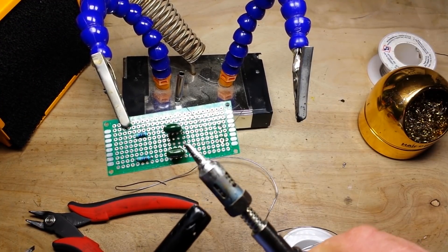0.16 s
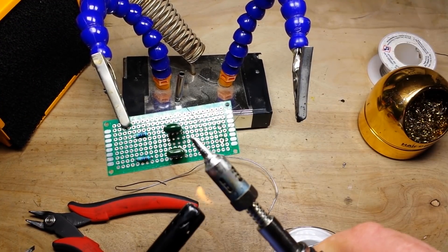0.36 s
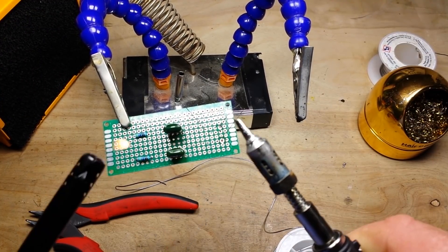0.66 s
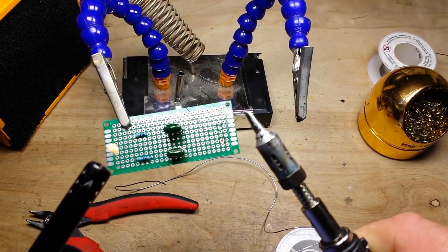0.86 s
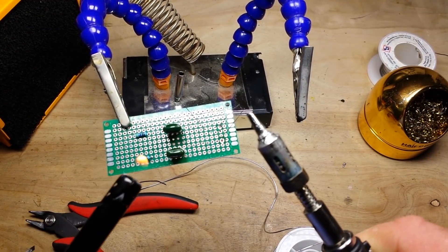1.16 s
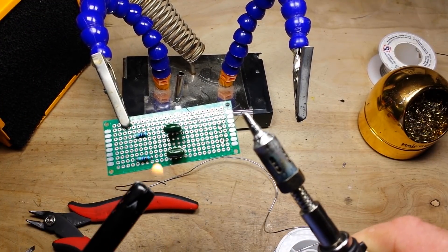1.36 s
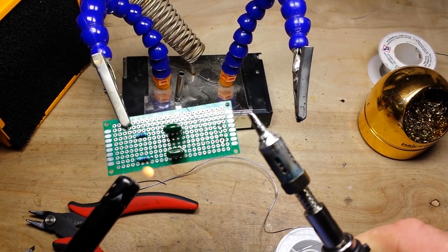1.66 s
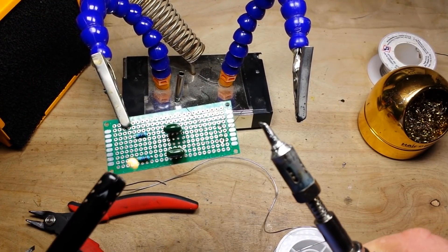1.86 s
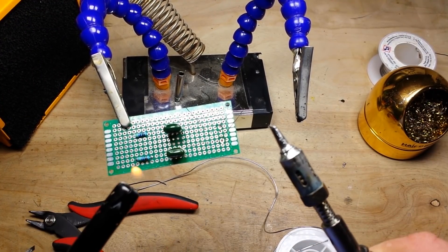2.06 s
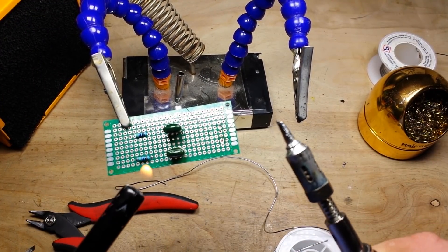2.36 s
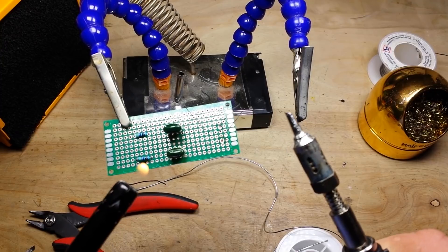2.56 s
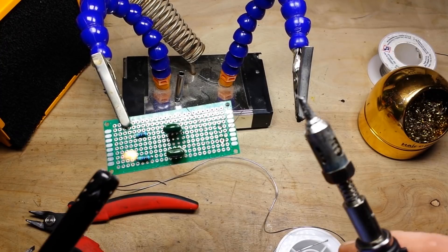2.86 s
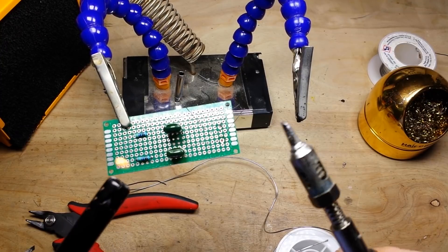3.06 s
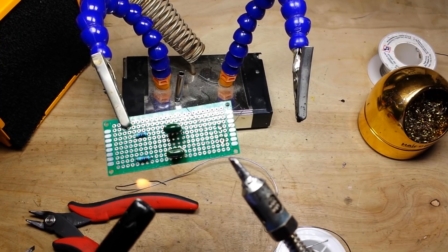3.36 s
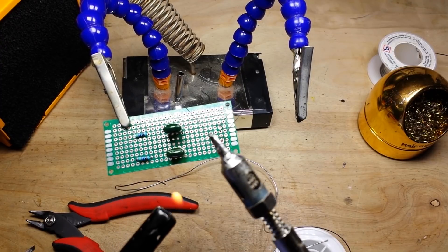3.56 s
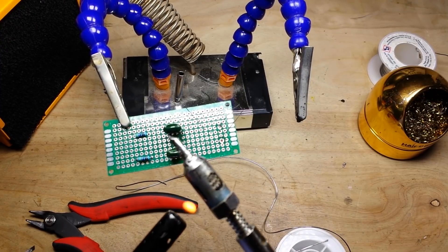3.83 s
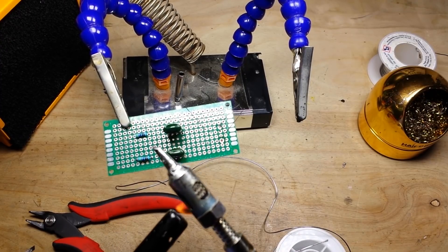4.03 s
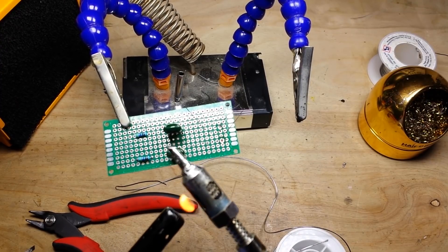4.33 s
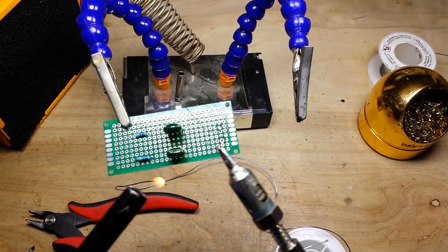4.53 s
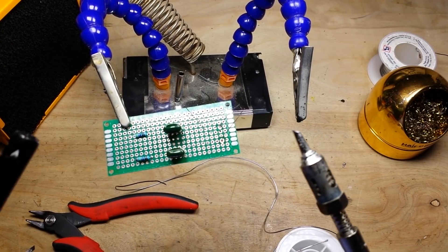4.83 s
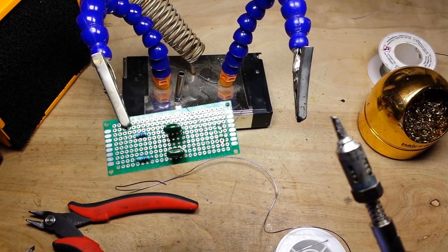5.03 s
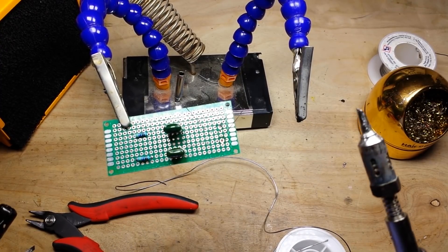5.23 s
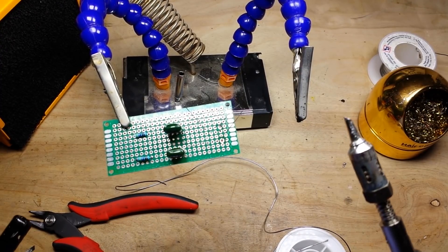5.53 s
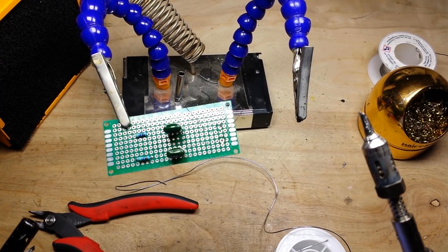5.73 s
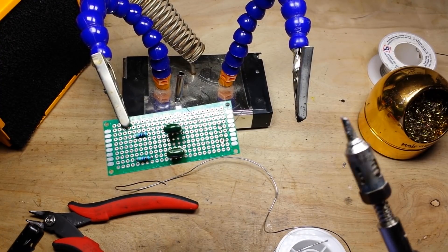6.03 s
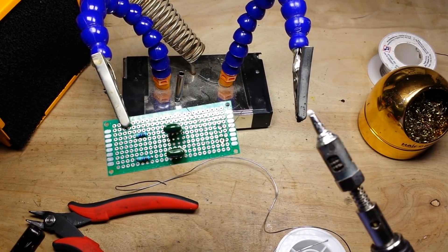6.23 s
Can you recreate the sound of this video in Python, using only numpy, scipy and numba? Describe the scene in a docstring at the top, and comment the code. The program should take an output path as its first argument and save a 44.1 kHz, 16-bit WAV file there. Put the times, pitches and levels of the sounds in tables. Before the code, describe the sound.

In a small workshop, a gas soldering iron hisses close by, slightly right, its breathy high jet swelling and fading over a low hum. Dry metal and plastic ticks and snaps come irregularly, with a strong one before two seconds. A soft bench thud just precedes the loudest snap at five seconds; then only hiss and hum remain. Close stereo microphones catch brief room reflections.

```python
"""A gas hiss that swells and fades as the iron turns, over a low hum, runs throughout: a small soldering
iron, a little to the right of a close microphone pair. Its gas, vents and nozzle whistle are shaped noise.
Among it come short chirps, ticks and snaps of valve parts and a long lighter, struck as decaying modes.
A small room answers each click with scatter and dense echoes; a soft bench thud comes near the end.
Gain control ducks peaks over its threshold, and the output is rounded and loses its extreme treble."""
import sys
import numpy as np
from scipy import signal
from scipy.fft import rfft, irfft, next_fast_len
from scipy.io import wavfile
from scipy.ndimage import uniform_filter1d, minimum_filter1d
from numba import njit

SR = 44100
rng = np.random.default_rng(int(sys.argv[2]) if len(sys.argv) > 2 else 0)


def int16_out(signal):
    """Quantize to a 16-bit WAV file."""
    q = np.round(np.clip(np.atleast_2d(signal).T, -1, 1) * 32767)
    wavfile.write(sys.argv[1], SR, q.astype(np.int16))


N = 281773
LEFT_LAG = 15  # samples by which sound from the right reaches the left microphone late
HISS_TOP_HZ = 14550  # upper limit of every shaped noise


def undb(db):
    """Decibel law: amplitude gain of a level in dB."""
    return 10 ** (np.asarray(db) / 20)


def curves(table):
    """Linear interpolation: the columns of a table as functions of time."""
    s, *columns = np.transpose(table)
    return [np.interp(np.arange(N) / SR, s, column) for column in columns]


def noise(points, channels=2):
    """Spectral shaping: independent noises, jointly scaled to rms 1, coloured by (Hz, relative dB) points."""
    size = next_fast_len(N, True)
    hz = np.arange(1, size // 2 + 2) * SR / size
    point_hz, point_db = np.array(points).T
    gain = undb(np.interp(np.log(hz), np.log(point_hz), point_db)) * (hz < HISS_TOP_HZ)
    spectrum = rfft(rng.standard_normal((channels, size))) * gain
    shaped = irfft(spectrum, size)[:, :N]
    return shaped / shaped.std()


def walk(rate):
    """Random modulation: levels held 1 / rate s and smoothed twice, with a spread near 1."""
    hold = int(SR / rate)
    steps = np.repeat(rng.standard_normal(N // hold + 1), hold)
    return 1.3 * uniform_filter1d(uniform_filter1d(steps, hold), hold)[:N]


def pair(x, alike, lag=0):
    """Interaural coherence: two noises share a part, which comes lag samples late on the left."""
    alike = np.clip(alike, 0, 1)
    left = alike * np.roll(x[0], lag) + np.sqrt(1 - alike ** 2) * x[1]
    return np.array([left, x[0]])


def narrow(hz, width):
    """Resonance: noise in one narrow band, shared in part by both sides."""
    peak = [(hz - 3 * width, -40), (hz - width / 2, -3), (hz, 0), (hz + width / 2, -3), (hz + 3 * width, -40)]
    return pair(noise(peak), 0.13, LEFT_LAG)


# background levels before quick flutter: start_s [s], hum_level_db [dB], air_level_db [dB]
BACKGROUND_LEVELS = [(0, -53.5, -59.5), (.35, -53.5, -57.5), (.65, -54.5, -58.5), (.95, -57.5, -64),
                     (1.4, -61, -62.5), (1.75, -57, -63.5), (2.25, -61.5, -64), (2.7, -59, -60.5),
                     (3.25, -61, -58), (3.85, -60.5, -60.5), (4.2, -58.5, -62), (4.7, -62.5, -60.5),
                     (5, -63, -58), (5.25, -68, -60.5), (5.8, -70, -66), (6.05, -64, -62), (6.39, -61, -57)]
# building hum spectrum: pitch_hz [Hz], relative_density_db [dB per Hz]
HUM_COLOUR = [(50, -47), (85, -23), (113, -2), (184, -2), (215, -6), (295, 3), (329, -3.5), (417, -6.5),
              (451, -16.5), (555, -8), (689, -20), (900, -16.5), (1170, -21), (1980, -120)]
# wide air noise spectrum: pitch_hz [Hz], relative_density_db [dB per Hz]
AIR_COLOUR = [(400, -3), (700, -7.5), (1200, -8), (2000, -7.5), (3500, -8.5), (6000, -9), (10000, -16.5),
              (14500, -18)]
# building rumble spectrum: pitch_hz [Hz], relative_density_db [dB per Hz]
RUMBLE_COLOUR = [(15, -34), (28, -16), (38, -3), (52, -5.5), (60, 0), (68, -20), (85, 2), (110, -42)]
# mains tones: pitch_hz [Hz], middle_rms_level_db [dB]
MAINS_TONES = [(59.5, -77), (119.8, -72)]
RUMBLE_DB, RUMBLE_SWING_DB, RUMBLE_PER_S = -72.5, 3.5, 3  # middle level, swing, level steps per s


def background():
    """Long waves reach close microphones alike: coherent hum and rumble, diffuse air, wavering mains tones."""
    hum_db, air_db = curves(BACKGROUND_LEVELS)
    t = np.arange(N) / SR
    tones = 0
    for hz, db in MAINS_TONES:
        # root 2 turns rms into amplitude
        tones = tones + np.sqrt(2) * undb(db + 3.5 * walk(4.5)) * np.sin(2 * np.pi * hz * t)
    hum = pair(noise(HUM_COLOUR), 0.94) * undb(hum_db + 1.5 * walk(14))
    air = pair(noise(AIR_COLOUR), 0.2) * undb(air_db + 1.3 * walk(20))
    rumble = pair(noise(RUMBLE_COLOUR), 0.86) * undb(RUMBLE_DB + RUMBLE_SWING_DB * walk(RUMBLE_PER_S))
    return hum + rumble + air + tones


WHISTLE_HZ, WHISTLE_WIDTH_HZ = 9370, 120  # band before the drift
WHISTLE_BLUR = 0.292  # quick wobble as a share of the drift
# whistle drift as the iron turns, before the quick wobble: start_s [s], pitch_offset_hz [Hz]
WHISTLE_DRIFT_HZ = [(0, 31), (2.92, 29.5), (3.02, 550.5), (3.12, 330), (3.3, 550), (3.42, -50), (5.2, -32),
                    (6.39, 30)]


def whistle():
    """Single-sideband shift: a rotating phase moves the narrow nozzle band along its drift."""
    drift_hz = curves(WHISTLE_DRIFT_HZ)[0] * (1 + WHISTLE_BLUR * walk(150))
    turn = np.exp(2j * np.pi * np.cumsum(drift_hz) / SR)
    analytic = signal.hilbert(narrow(WHISTLE_HZ, WHISTLE_WIDTH_HZ), next_fast_len(N))[:, :N]
    return np.real(analytic * turn)


# iron turned in the hand, before flutter: start_s [s], jet_level_db [dB],
# vents_facing_right [0-1], whistle_over_jet_db [dB]
IRON_TURNS = [(0, -59, 0, -17), (.5, -57.5, 0, -10), (.7, -58.5, .15, -14), (.95, -63, 0, -23),
              (1.9, -61, 0.53, -17), (2.4, -64, 0.5, -13), (2.7, -56, 1, -1.5), (2.95, -54.5, 1, 1.5),
              (3.3, -53, 1, -2), (3.8, -53, 0.68, -9), (4.0, -58, .4, -9), (4.6, -58, 0.35, -8),
              (4.95, -54.5, 0.66, -13), (5.25, -60, 0.83, -7.5), (5.9, -59, 0.56, 0), (6.25, -55, 0.5, -2),
              (6.39, -55.5, .7, -4)]
# turbulent gas spectrum: pitch_hz [Hz], relative_density_db [dB per Hz]
GAS_COLOUR = [(2000, -70), (3500, -37), (5000, -10), (6500, -2), (8300, -7), (10500, -21.5), (12000, -11),
              (14500, -13)]
# burner vent bands: pitch_hz [Hz], width_hz [Hz], relative_level_db [dB]
VENT_BANDS = [(5740, 350, -7.5), (7560, 810, -15), (8950, 190, -11), (9630, 920, -8.5), (10190, 1740, -5.5)]


def jet():
    """Turbulence noise with vent resonances; shading weakens the left, the vents more so at high pitch."""
    db, facing, whistle_db = curves(IRON_TURNS)
    # vents facing the right microphone sound stronger and shade the left more
    vents_db = -0.5 + 6 * facing
    pan_db = -9.5 - 5 * facing
    left = np.array([pan_db, 0 * pan_db])  # left and right offsets, scaled for each part below
    gas = pair(noise(GAS_COLOUR), 0.14, LEFT_LAG) * undb(1.07 * walk(9) + 0.92 * left)
    for hz, width, vent_db in VENT_BANDS:
        vent_level_db = vent_db + vents_db + 2.0 * walk(8) + left * hz / 9500
        gas = gas + narrow(hz, width) * undb(vent_level_db)
    gas = gas + whistle() * undb(whistle_db + 1.7 * walk(9) + 0.91 * left)
    return gas * undb(db)


CHIRP_S, CHIRP_WIDTH = 0.017, 0.06  # half length in s; bandwidth as a share of the pitch
# faint chirps as the tools shift in the hands: centre_s [s], level_db [dB], pitch_hz [Hz]
TOOL_CHIRPS = [(.075, -62, 2540), (.225, -73, 2700), (.96, -57, 7400), (1.165, -64.5, 2580),
               (1.39, -58, 8000), (1.48, -65.5, 3200), (1.535, -62.5, 2520), (2.1, -56, 7460),
               (2.11, -61, 2560), (3.17, -62, 1770), (3.615, -58.5, 2520), (4.105, -62, 1520)]


def chirps():
    """Gated resonance: a bell-shaped envelope turns narrow noise into a brief squeak."""
    t = np.arange(N) / SR
    out = 0
    for s, db, hz in TOOL_CHIRPS:
        envelope = np.exp(-((t - s) / CHIRP_S) ** 2)
        out = out + undb(db) * envelope * narrow(hz, CHIRP_WIDTH * hz)
    return out


def ring(modes, tune=1.):
    """Modal decay: a struck part rings in damped sines; so small a part radiates little below its lowest."""
    t = np.arange(2048) / SR
    y = 0
    for k, (hz, db, t60) in enumerate(modes):
        tone = np.sin(2 * np.pi * hz * tune * t) * 1000. ** (-t / t60)
        y = y + (-1) ** k * undb(db) * tone
    highpass = signal.butter(4, 0.85 * modes[0][0], "high", fs=SR, output="sos")
    return signal.sosfilt(highpass, y)


# clicks of valve parts and lighter: start_s [s], snap_level_db [dB], then shares over the snap:
# low_body_db [dB], high_body_db [dB], cap_db [dB], sleeve_db [dB]
TOOL_CLICKS = [(0.1359, -49, 1, -2, -14, -17), (.205, -49.5, 6.5, -12, -8, -17),
               (.2927, -48, -1, -12, -22, -15), (0.4682, -28.5, -6.5, -3.5, -13, -12.5),
               (0.4935, -23.5, -14, -17, -20, -17.5), (0.7136, -46.5, 3, -6, -6.5, -16),
               (0.8273, -35.5, -10, -4, -19, -14.5), (.9595, -48, 0.5, -13, -16, -15),
               (1.388, -48.5, 1.5, -11, -13, -13), (1.7078, -33, -7.5, -2.5, -16, -16),
               (1.7147, -27, -16, -24, -17, -15.5), (1.7989, -14.5, -19.5, -25, -17.5, -17.5),
               (2.0373, -35.5, -11, -7, -13, -15), (2.0473, -24.5, -21, -11, -13.5, -20),
               (2.4362, -38, -9.5, -16, -12, -18), (2.5011, -34.5, -13, -2.5, -6, -12),
               (2.5057, -21.5, -26, -22, -21, -18), (2.5863, -29.5, -17, -13.5, -11, -15),
               (2.628, -38.5, -7, -9, -8, -11), (2.7376, -28, -12, -9, -14.5, -12),
               (2.9738, -38.5, -3, -5, -7, -7.5), (2.9982, -25, -11.5, -14.5, -11.5, -12),
               (3.0342, -39, -20, -6, -17, -18), (3.1604, -47, -16, 0.5, -18, -22),
               (3.2967, -43.5, -5, -5, -23, -24), (3.4158, -38.5, -10, -8, -19, -14),
               (3.4336, -36, -8, -12, -10.5, -11.5), (3.458, -38, -30, -30, -19, -21),
               (3.5954, -45.5, -6.5, -5, -19, -16), (4.0039, -46, -7, 2.5, -22, -24),
               (4.1894, -55.5, 7, 9, -13, -15), (4.3569, -46, -4, 6.5, -21, -8),
               (4.366, -26, -28, -27, -20, -14), (4.565, -34, -15, -4.5, -12.5, -27),
               (4.5948, -46.5, -6, 3, -12, -11), (4.6374, -30.5, -16, -7, -12, -14),
               (4.752, -35, -16, -3.5, -17, -20), (4.7828, -41.5, -10, -2.5, -17, -19),
               (4.837, -40, -20, -18, -29, -22), (4.8753, -23, -21.5, -28, -25, -24),
               (4.901, -38, -22, -17, -22, -21), (5.01, 2.5, -33, -24.5, -19, -10.5)]
# modes of the parts, before detuning: pitch_hz [Hz], relative_level_db [dB], t60_s [s]
# latch
LATCH_MODES = [(5370, -4, 0.0024), (6460, -8, 0.003), (7120, -5.5, 0.0066), (7570, 4.5, 0.0004)]
# plastic handle, two low modes and then the high ones
HANDLE_MODES = [(977, -6.5, 0.04), (1315, -9.5, 0.0062), (1522, 2.5, 0.0036), (1657, 7.5, 0.0075),
                (2230, -12.5, 0.0091)]
# valve cap
CAP_MODES = [(2770, -16.5, 0.011), (2816, 7, 0.0045)]
# metal sleeve
SLEEVE_MODES = [(3634, 1, 0.018), (4290, -2, 0.0024), (4346, -8.5, 0.011), (4680, 6, 0.0043)]
# latch spring
SPRING_MODES = [(8900, -44, 0.0013), (12200, -36, 0.0013), (13300, -35, 0.0019)]
DETUNE = 0.025  # spread of the shift of a part's modes, as a share of pitch, new at each click
SPRING_SHARE_DB, SPRING_RISE = -8, 0.15  # spring over a snap of 0 dB; added dB for each dB of snap
CLICK_PAN_DB = -8.5  # left minus right, scaled by the shade of each part
ROOM_SHARE_DB, ROOM_RISE = -1.5, 0.13  # sent to the walls by a snap of 0 dB; added dB for each dB of snap
RATTLE_MS, SENT_MS = 2.07, 0.35  # decay constants of the rattle and of the ring the walls hear


def clicks():
    """Impact excitation: a blow and short rattle ring each part; the left hears it later and shaded.
    The walls hear mostly the start of each ring, from all sides, which evens out its colour."""
    size = 512
    t_ms = 1000 * np.arange(size) / SR
    chance = rng.standard_normal((len(TOOL_CLICKS), size))
    direct, sent = np.zeros((2, N + 8 * size)), np.zeros((1, N + 8 * size))
    part_modes = (LATCH_MODES, HANDLE_MODES[:2], HANDLE_MODES[2:], CAP_MODES, SLEEVE_MODES, SPRING_MODES)
    shades = (2.17, 0.2, 0.053, 0.062, 0.79, 0.5)  # in the order of the parts
    for (s, db, *shares_db), c in zip(TOOL_CLICKS, chance):
        blows = c * np.exp(-t_ms / RATTLE_MS) * np.clip(t_ms / 0.17 - 1, 0, 1)
        blows[20] = 3.2  # the main contact
        i = int(s * SR)
        part_shares_db = (0, *shares_db, SPRING_SHARE_DB + SPRING_RISE * db)
        for k, (modes, share_db, shade) in enumerate(zip(part_modes, part_shares_db, shades)):
            # contact takes a moment
            part = np.convolve(ring(modes, 1 + DETUNE * c[k]), np.hanning(5))
            energy = np.sum(part ** 2)
            y = signal.fftconvolve(blows, part)
            y = y * np.sqrt(energy / np.sum(y ** 2))  # the rattle shares out the energy of one blow
            half_pan_db = shade * CLICK_PAN_DB / 2
            direct[0, i + LEFT_LAG:i + LEFT_LAG + len(y)] += y * undb(db + share_db + half_pan_db)
            direct[1, i:i + len(y)] += y * undb(db + share_db - half_pan_db)
            brief = part[:size] * np.exp(-t_ms / SENT_MS)
            brief = brief * np.sqrt(energy / np.sum(brief ** 2))
            sent[0, i:i + size] += brief * undb(db + share_db + ROOM_SHARE_DB + ROOM_RISE * db)
    return direct[:, :N], sent[:, :N]


ROOM_T60_S, TAIL_DB = 0.24, 1.5  # decay below the treble; energy level of the whole response
TAIL_DELAY_S = 0.0019  # middle of the echo onset
ECHO_S, ECHO_DB, ECHO_SPREAD_S = 0.0094, -3, 0.00077  # slap of the nearest wall, over the decay
TREBLE_HZ, TREBLE_LOSS_DB_S = 7500, 120  # above this pitch echoes lose this many more dB per s
# spectrum the walls give back: pitch_hz [Hz], relative_density_db [dB per Hz]
ECHO_COLOUR = [(800, -5.5), (1800, -2), (3000, 2.5), (4500, -1), (6200, 5.5), (8000, 0.5), (11000, -2),
               (14000, 0.5)]


def walls(x):
    """Reverberation: close scatter from bench objects, then dense decaying echoes, unlike on each side."""
    t = np.arange(SR // 2) / SR
    scatter = undb(13.0) * 1000. ** (-t / 0.055)
    decay = 1000. ** (-t / ROOM_T60_S) + scatter
    decay = decay * (1 + undb(ECHO_DB) * np.exp(-((t - ECHO_S) / ECHO_SPREAD_S) ** 2))
    echoes = noise(ECHO_COLOUR)[:, :len(t)]
    low = signal.sosfiltfilt(signal.butter(2, TREBLE_HZ, fs=SR, output="sos"), echoes)
    treble = (echoes - low) * undb(-TREBLE_LOSS_DB_S * t)
    tail = (low + treble) * decay * np.clip(t / TAIL_DELAY_S - 0.5, 0, 1)
    tail = tail * undb(TAIL_DB) / np.sqrt(np.sum(tail ** 2, axis=1, keepdims=True))
    return signal.fftconvolve(tail, x, axes=1)[:, :N]


# a hand meets the bench: centre_s [s], level_db [dB], pitch_hz [Hz]
BENCH_THUDS = [(4.958, -42.5, 139)]


def thuds():
    """Damped vibration: each soft bump through the bench is a low sine in a bell-shaped envelope."""
    t, out = np.arange(N) / SR, 0
    for s, db, hz in BENCH_THUDS:
        envelope = np.exp(-((t - s) / 0.0054) ** 2)
        out = out + undb(db) * envelope * np.sin(2 * np.pi * hz * (t - s))
    return out


def scene():
    """Superposition: the pressures of all sources add at the two microphones."""
    direct, sent = clicks()
    return background() + jet() + chirps() + direct + walls(sent) + thuds()


@njit
def duck(peak, top, attack, release, strength):
    """Feed-forward compression: gain falls while the followed peak level is over the threshold."""
    gain, level = np.ones(len(peak)), 0.
    for i in range(len(peak)):
        level += (peak[i] - level) * (attack if peak[i] > level else release)
        if level > top:
            gain[i] = (top / level) ** strength
    return gain


MIC_TOP_HZ, TOP_HZ = 14700, 16600  # corners of the microphone and of the final treble cut
CEILING = 0.85  # amplitude that the soft rounding approaches
# gain control: threshold [amplitude], attack_s [s], release_s [s], strength [0-1]
GAIN_CONTROL = [(0.08, 0.00079, 0.0088, 0.34)]


def record(dry):
    """Band limiting and saturation: a dull microphone top, peak gain control, soft rounding, treble cut."""
    dry = signal.sosfilt(signal.butter(4, MIC_TOP_HZ, fs=SR, output="sos"), dry)
    # running maximum over 257 samples of the louder side
    peak = -minimum_filter1d(-np.abs(dry).max(axis=0), size=257, origin=128)
    for top, attack_s, release_s, strength in GAIN_CONTROL:
        dry = dry * duck(peak, top, 1 / (attack_s * SR), 1 / (release_s * SR), strength)
    rounded = CEILING * np.tanh(dry / CEILING)
    return signal.sosfilt(signal.ellip(10, 0.2, 80, TOP_HZ, fs=SR, output="sos"), rounded)


dry = scene()
out = record(dry)
int16_out(out)
```